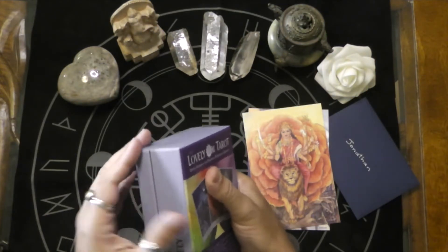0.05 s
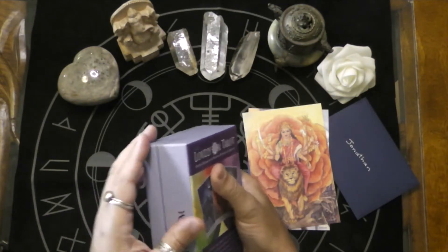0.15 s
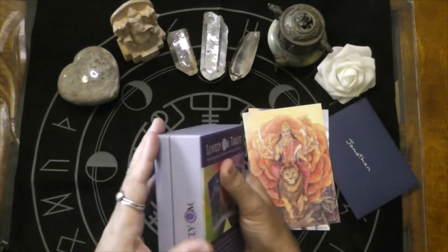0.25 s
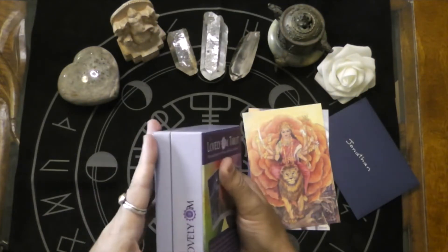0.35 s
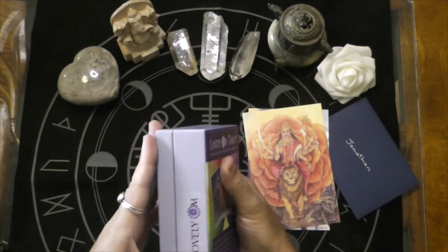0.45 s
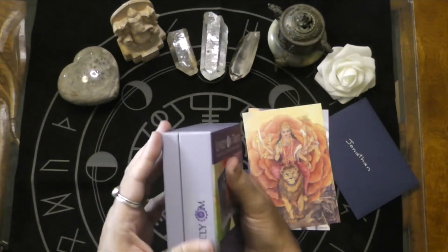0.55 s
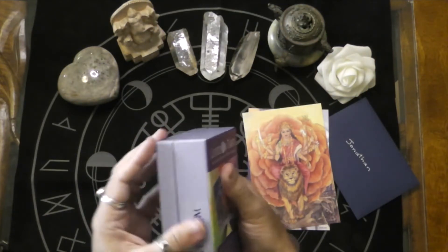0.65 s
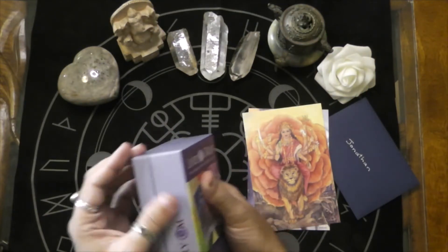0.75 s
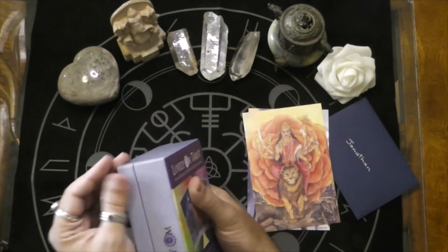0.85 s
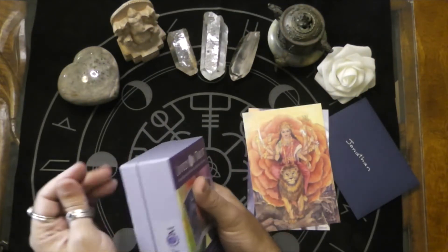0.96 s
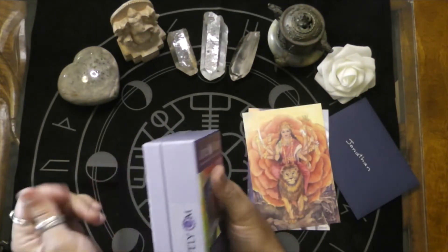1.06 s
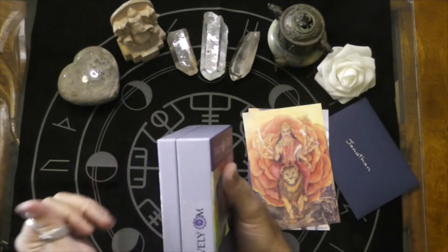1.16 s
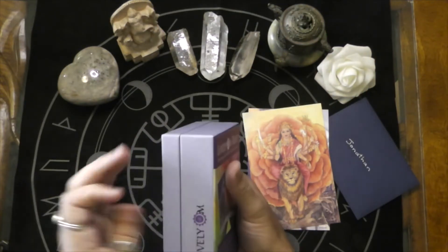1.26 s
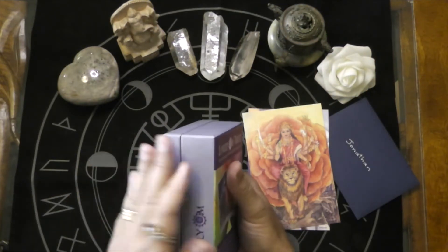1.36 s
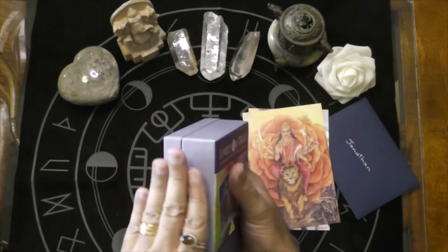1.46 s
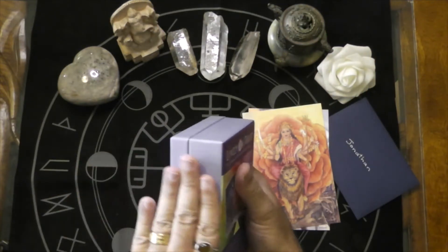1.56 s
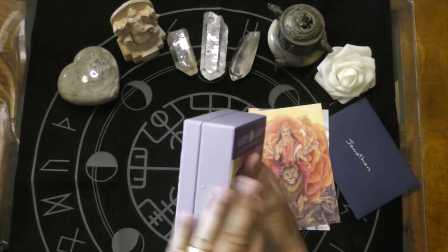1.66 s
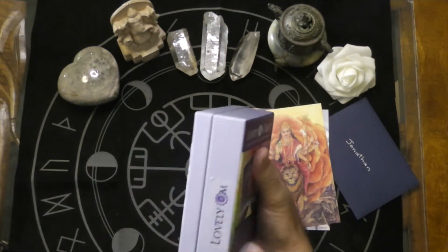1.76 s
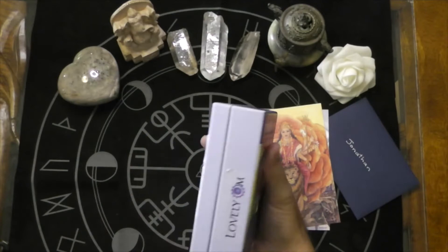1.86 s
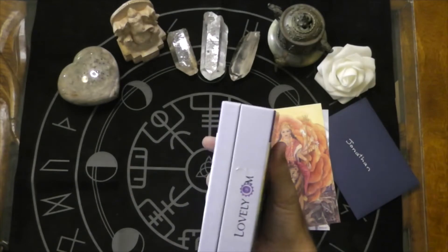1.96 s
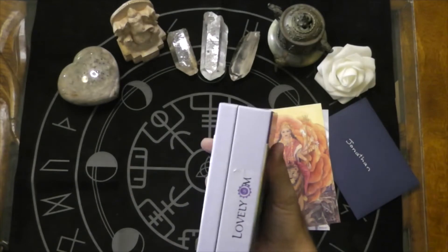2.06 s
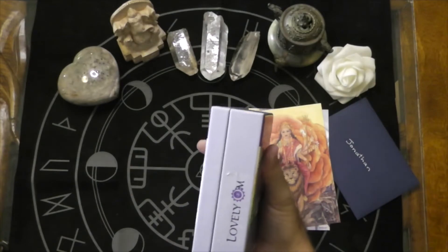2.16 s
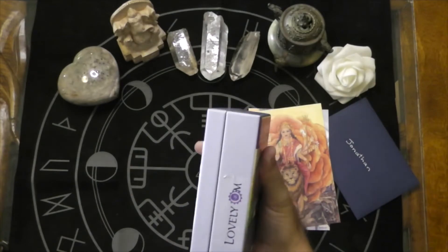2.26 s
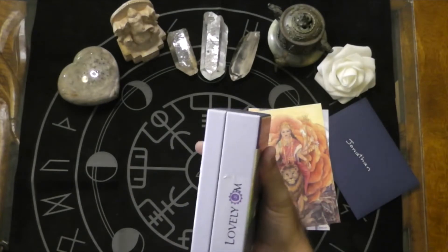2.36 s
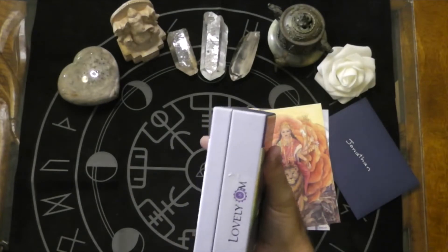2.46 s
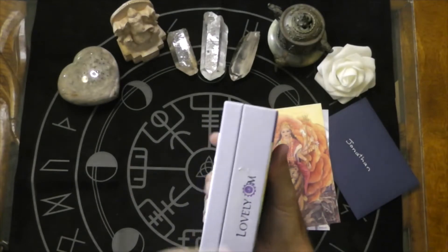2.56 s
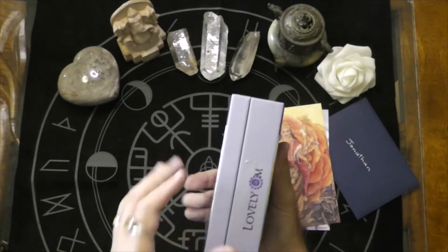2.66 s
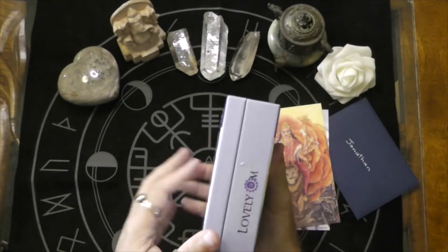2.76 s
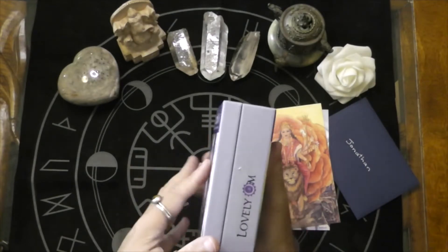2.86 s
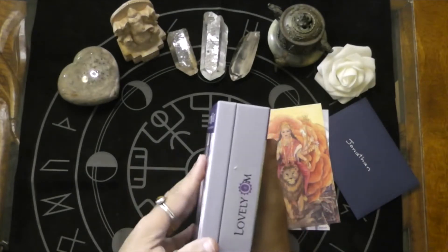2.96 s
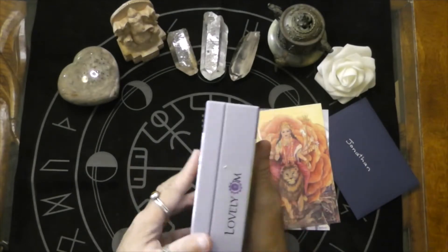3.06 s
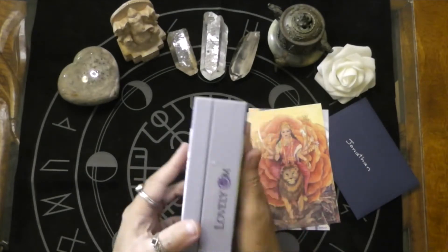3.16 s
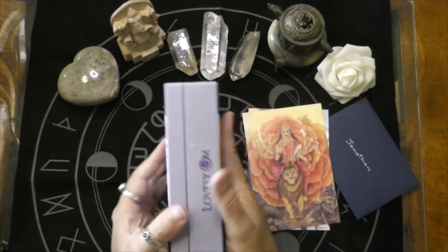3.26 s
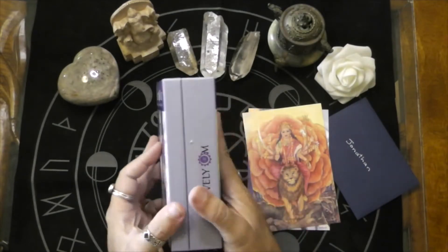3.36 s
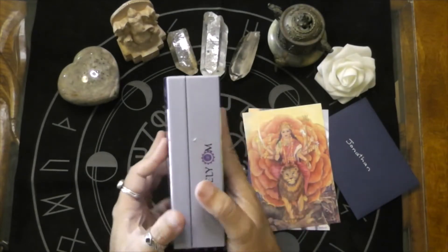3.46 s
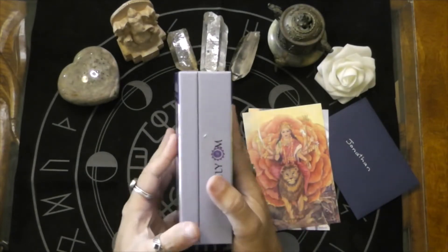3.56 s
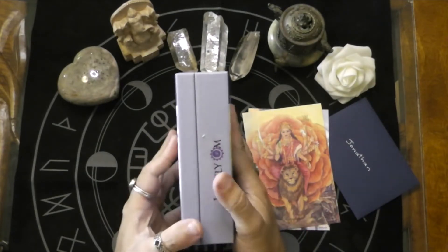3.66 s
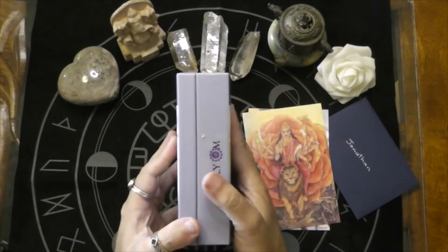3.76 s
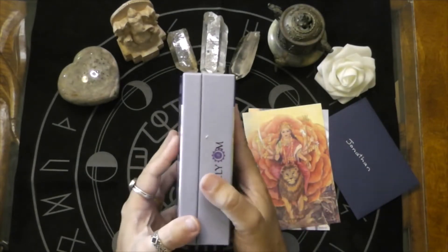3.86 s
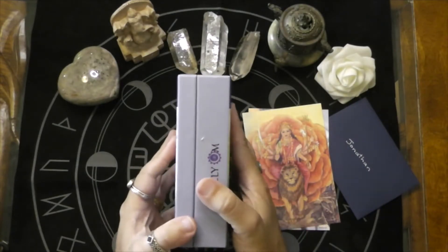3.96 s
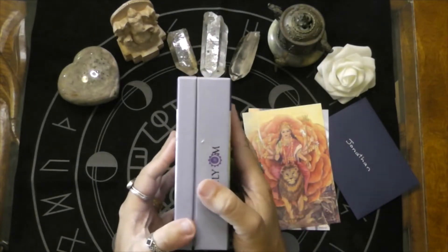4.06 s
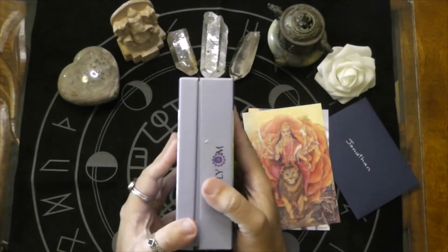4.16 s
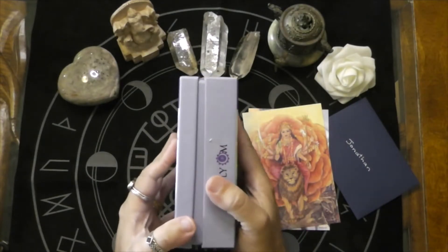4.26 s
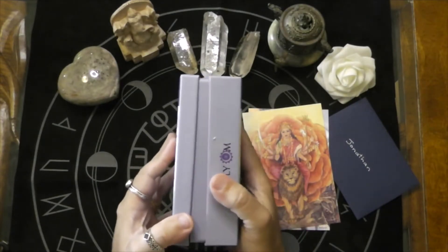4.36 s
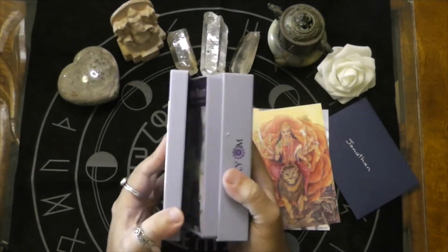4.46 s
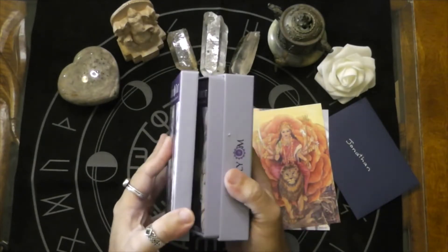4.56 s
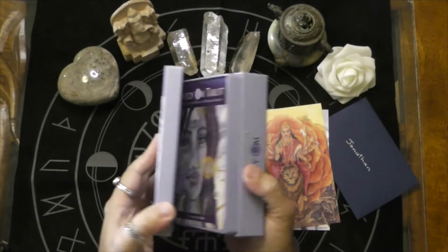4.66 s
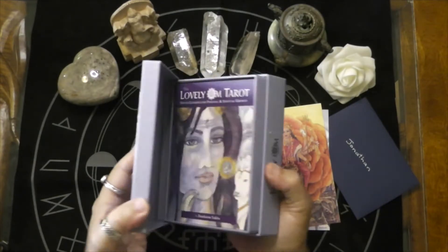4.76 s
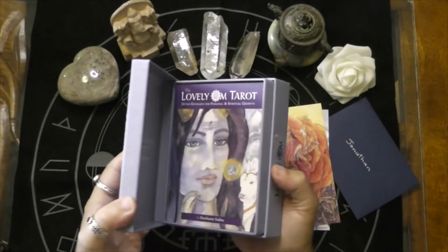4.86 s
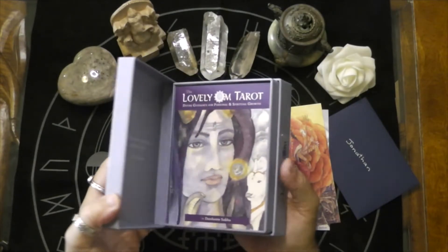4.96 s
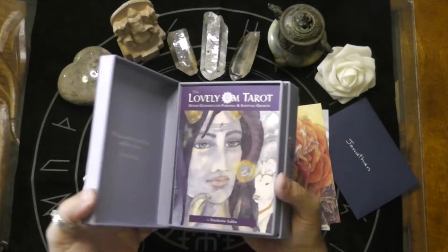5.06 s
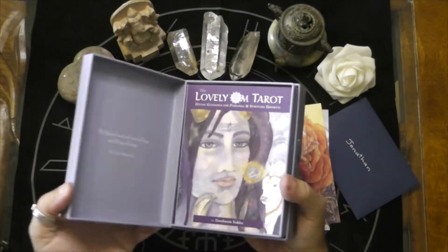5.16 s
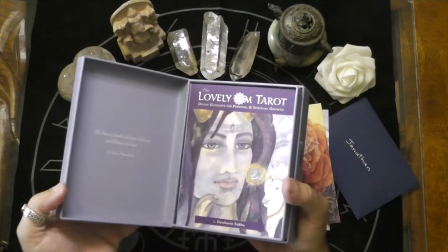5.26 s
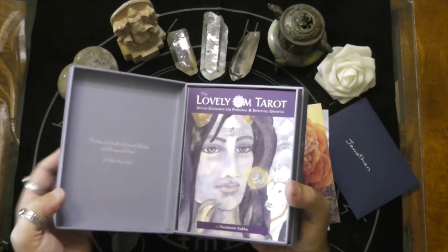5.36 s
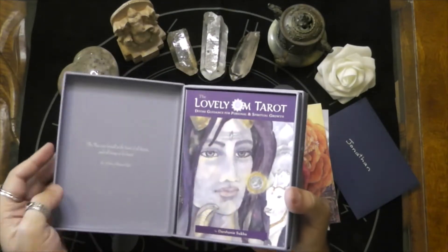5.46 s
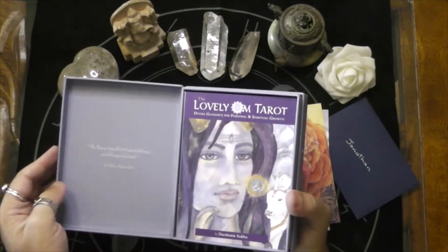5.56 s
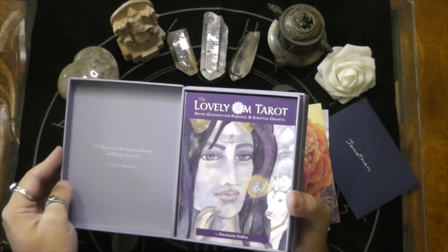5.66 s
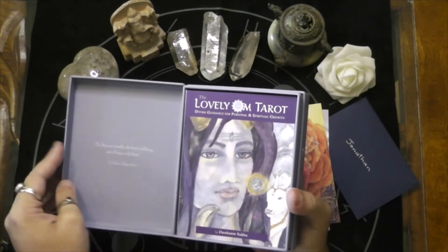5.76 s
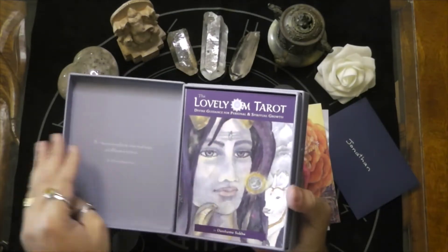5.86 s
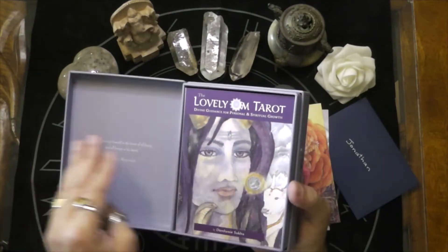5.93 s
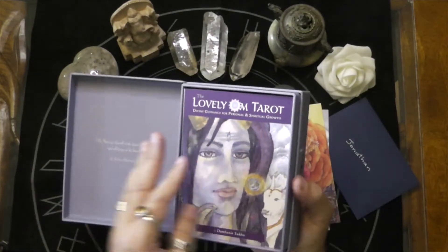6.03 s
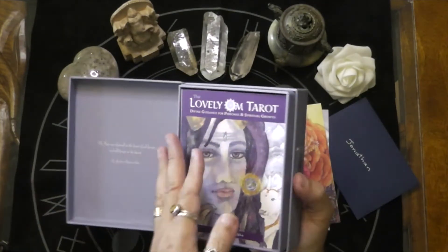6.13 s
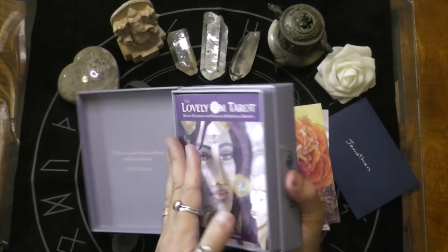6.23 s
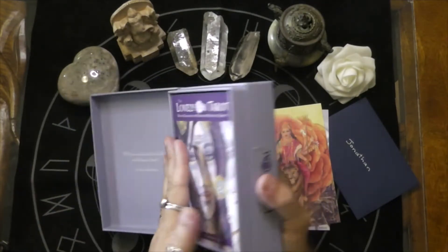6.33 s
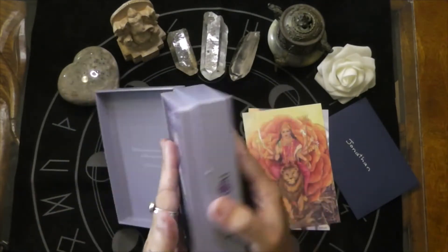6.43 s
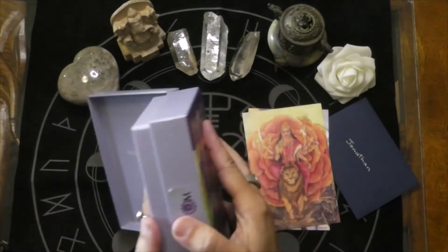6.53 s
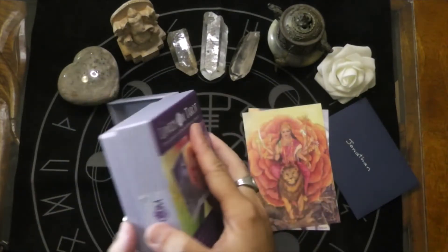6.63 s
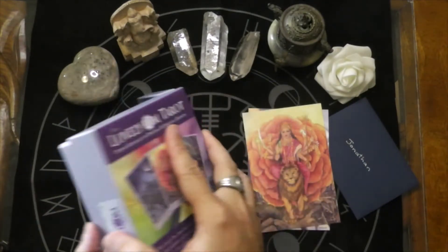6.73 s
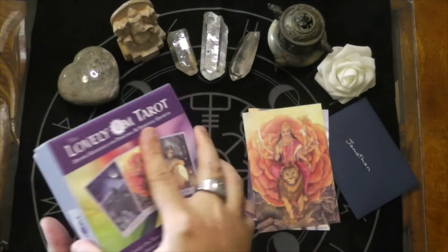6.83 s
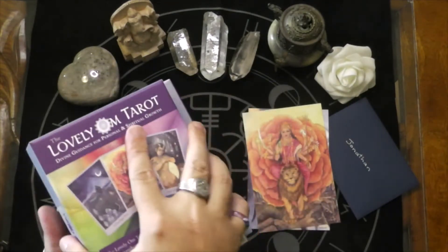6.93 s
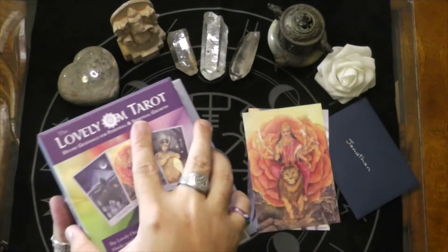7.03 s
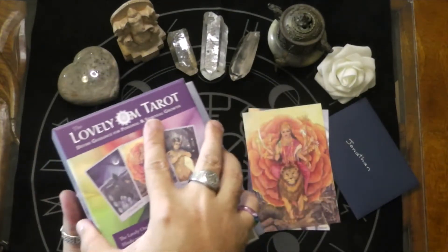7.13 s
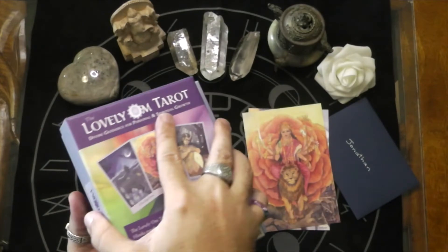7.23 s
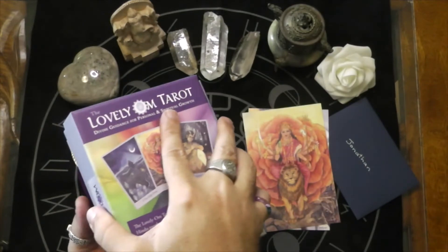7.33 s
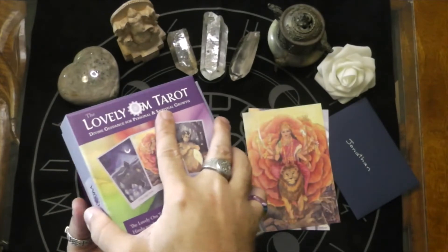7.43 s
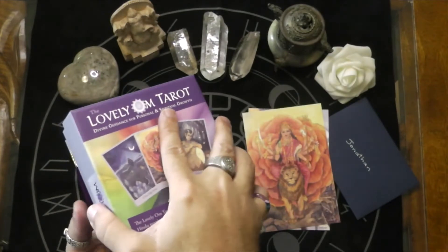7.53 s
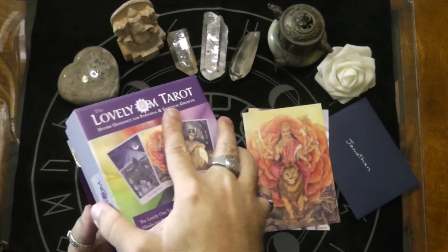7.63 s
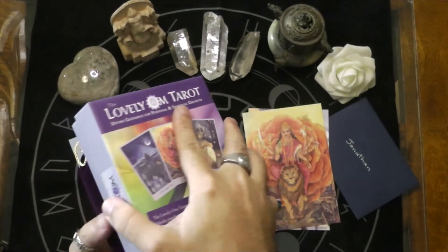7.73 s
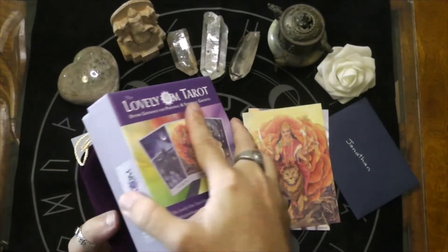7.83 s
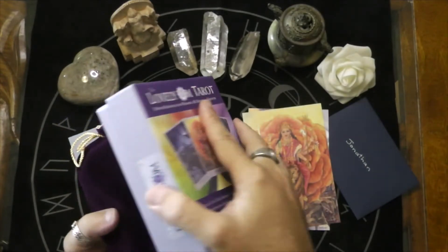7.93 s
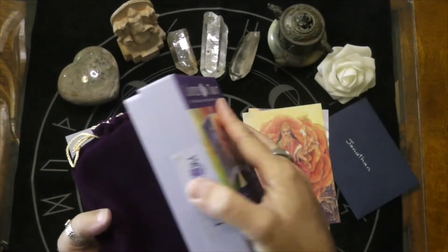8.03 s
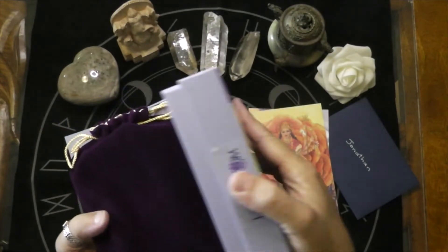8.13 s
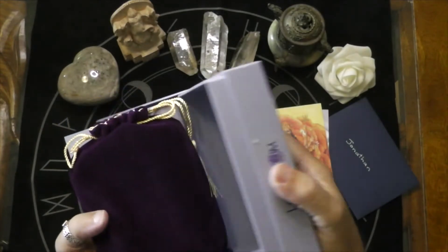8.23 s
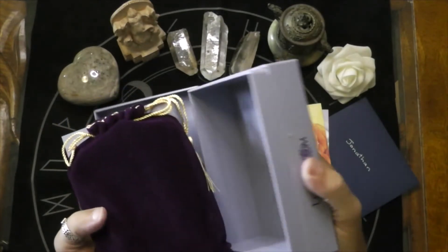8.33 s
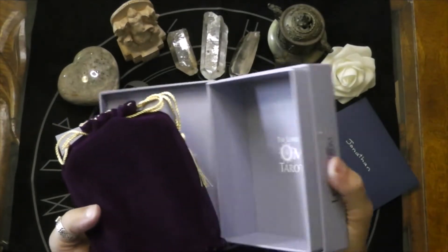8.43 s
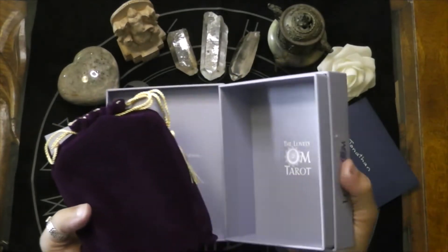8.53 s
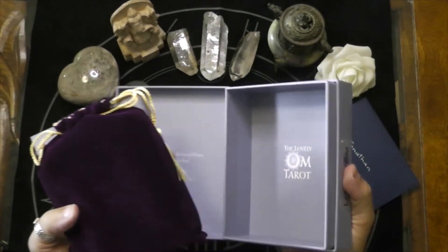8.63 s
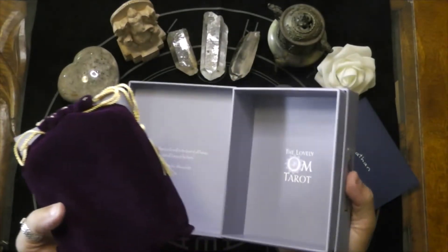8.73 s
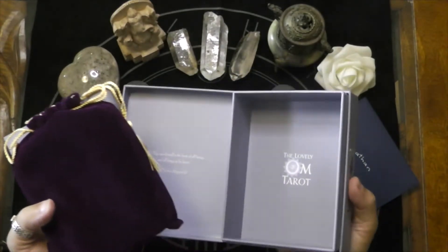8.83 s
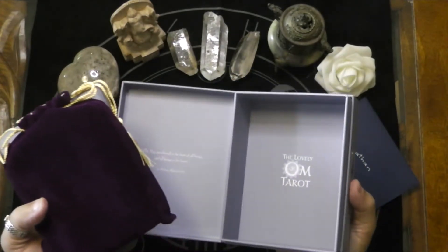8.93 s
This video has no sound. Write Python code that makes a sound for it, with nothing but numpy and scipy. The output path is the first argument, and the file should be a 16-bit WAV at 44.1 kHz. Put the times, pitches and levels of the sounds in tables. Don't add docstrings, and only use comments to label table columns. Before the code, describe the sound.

A quiet indoor room, close stereo microphone, with low room tone, soft hiss, a faint distant motor hum and slight floor shake. From 0 to 0.9 seconds fingers tick, tap and rub a stiff cardboard box in dry, hissing strokes. Lighter touches follow around 1.0 to 1.3, then a busy burst at 1.4 to 1.8: snaps, hollow taps and the brightest rubbing. It quiets until about 2.4, when crisp ticks and short drags return, with a bright swish near 3.2. Sparse rubs and a dull tap come at 3.5 to 4.4. From 4.6 to 6.2 the lid opens with small scrapes, ticks and hollow taps. At 6.3 a loud, hard clack bounces rapidly and dies, followed by rough rubbing to 6.8. Softer low sliding and a tiny squeak come around 7.1, a faint tap at 7.7, then gentle brushing and small ticks until 9.

```python
import sys
import numpy as np
from scipy import signal
from scipy.fft import rfft, irfft, next_fast_len
from scipy.io import wavfile

SR = 44100
rng = np.random.default_rng(int(sys.argv[2]) if len(sys.argv) > 2 else 0)


def put_to_file(sound):
    columns = np.atleast_2d(sound).T
    safe = np.clip(columns, -1, 1)
    whole_steps = np.round(safe * 32767)
    wavfile.write(sys.argv[1], SR, whole_steps.astype(np.int16))


def decibels_to_gain(level_db):
    exponent = np.asarray(level_db, float) / 20
    return 10 ** exponent


N = 396459
STEP_HZ = 2280

# frequency in Hz, left minus right in dB.
LEAN = [(60, -3), (380, -2.5), (2380, -0.5), (15000, 1.5)]


def rms_one(x):
    return x / np.sqrt(np.mean(x ** 2) + 1e-20)


def at_hz(points, hz):
    table_hz, values = np.array(points).T
    return np.interp(np.log(hz), np.log(table_hz), values)


def drift(rate_hz):
    r = np.exp(-80 * np.pi * rate_hz / SR)
    white = rng.standard_normal(N // 40 + 2002)
    slow = signal.lfilter([1], [1, -2 * r, r * r], white)[2000:]
    return np.interp(np.arange(N) / 40, np.arange(len(slow)), rms_one(slow))


def ring(push, hz, t60_s):
    r, w = decibels_to_gain(-60 / (t60_s * SR)), 2 * np.pi * hz / SR
    return signal.lfilter([0, np.sin(w)], [1, -2 * r * np.cos(w), r * r], push + 1e-18)


def band_pass(x, order, low_hz, high_hz):
    return signal.sosfilt(signal.butter(order, [low_hz, high_hz], "band", fs=SR, output="sos"), x)


def below(x, hz):
    return signal.sosfilt(signal.cheby2(14, 60, hz, fs=SR, output="sos"), x)


def add(out, start_s, sound):
    i = round(start_s * SR)
    out[i:i + len(sound)] += sound[:N - i]


def to_stereo(mid, side, likeness, hz):
    alike = np.clip(at_hz(likeness, hz), 0, 1)
    lean = decibels_to_gain(at_hz(LEAN, hz) / 2 * np.array([[1], [-1]]))
    return lean * (np.sqrt(1 + alike) * mid + np.sqrt(1 - alike) * side * [[1], [-1]])


def coloured(spectrum, likeness):
    size = next_fast_len(N)
    hz = np.maximum(np.arange(size // 2 + 1) * SR / size, 1)
    mid, side = rfft(rng.standard_normal((2, size)))
    both = decibels_to_gain(at_hz(spectrum, hz)) * to_stereo(mid, side, likeness, hz)
    return rms_one(irfft(both, size)[:, :N])


def banded(spectrum, likeness, white, patchy_db, patch_hz, tilt_db=0):
    low_hz, high_hz = spectrum[0][0], spectrum[-1][0]
    edges = np.geomspace(low_hz, high_hz, int(3.5 * np.log2(high_hz / low_hz)) + 2)
    out, power = 0, 0
    for k, (low, high) in enumerate(zip(edges, edges[1:])):
        mid, side = band_pass(white[k % 2], 2, low, high)
        hz = np.sqrt(low * high)
        band = decibels_to_gain(at_hz(spectrum, hz)) * to_stereo(mid, side, likeness, hz)
        power += np.mean(band[:, ::7] ** 2)
        out = out + band * decibels_to_gain(patchy_db * drift(patch_hz) + tilt_db * np.log2(hz / 6000))
    return out / np.sqrt(power)


def grains(per_s, spread_db):
    born = rng.random(N) < per_s / SR
    sizes = decibels_to_gain(spread_db * np.minimum(rng.exponential(1, N), 2.5))
    white = np.clip(rng.standard_normal((2, 2, N)), -3, 3)
    return rms_one(white * (born * sizes + .6))


def slide():
    # frequency in Hz, density in dB per Hz.
    skin = [(2300, -21), (2700, -12), (3300, -15), (3900, -7.5), (6500, -6), (9200, -1.5), (10500, -1.5),
            (13500, -7), (17000, -3.5)]
    # frequency in Hz, density in dB per Hz.
    board = [(250, 3.5), (400, -4.5), (650, 8), (900, 2), (1400, 0.5), (2000, -5.5), (2500, -2.5)]
    # frequency in Hz, left-right likeness (0 to 1).
    near_likeness = [(60, 0.7), (240, 1), (950, 0.92), (3770, 0.61), (8000, 0.92), (15000, 0.8)]
    hiss_db, bright_db, board_db = strokes()
    skin_slips = grains(per_s=7000, spread_db=1.6)
    board_slips = grains(per_s=1500, spread_db=3.5)
    tilt_db = 0.56 * (bright_db - 3.5)
    hiss = banded(skin, near_likeness, skin_slips, patchy_db=1.8, patch_hz=11, tilt_db=tilt_db)
    rumble = banded(board, near_likeness, board_slips, patchy_db=2.8, patch_hz=13.5)
    flutter_db = .9 * drift(19)
    hiss = decibels_to_gain(hiss_db + 4.5 + flutter_db) * hiss
    return hiss + decibels_to_gain(board_db - 2.0) * below(rumble, 1.102 * STEP_HZ)


def strokes():
    # start in s, hold in s, hiss in dB, brightness in dB, board rumble in dB.
    rub_rows = [(0.016, 0.0084, -67, 4, -75), (0.094, 0.005, -59, -7, -55),
                (0.168, .25, -54.5, -0.5, -57.5), (0.534, 0.2, -54, -1, -58), (0.747, 0.11, -54, 1, -55),
                (1.056, 0.064, -62, 5, -66), (1.2, .03, -67, 3, -68), (1.316, 0.011, -64, 0, -66),
                (1.409, 0.027, -54, -8, -52), (1.429, 0.07, -51, 0, -53.5), (1.565, .02, -52.5, 1, -57),
                (1.582, 0.12, -46, 6.5, -55.5), (1.72, 0.037, -49.5, 1, -52), (3.122, 0.12, -55.5, 5, -60),
                (2.468, 0.052, -62.5, -2, -66), (2.568, 0.11, -57.5, -2.5, -53.5),
                (2.745, 0.12, -62.5, 1, -56.5), (3.764, 0.033, -59.5, 2, -57), (4.158, 0.0047, -59, 1, -52),
                (4.336, 0.13, -63.5, -4, -61), (4.654, 0.076, -60.5, -6, -57.5),
                (4.756, 0.036, -57, -1, -52.5), (4.902, 0.028, -61, 10, -69), (4.842, 0.12, -62.5, -2, -57),
                (4.992, 0.09, -61.5, -5, -51.5), (5.108, .04, -61, -6, -56), (5.18, 0.046, -60, -3, -55),
                (5.373, 0.11, -60.5, 2, -58.5), (5.744, .005, -61.5, -4, -67),
                (5.83, 0.017, -61.5, -5, -52.5), (6.01, 0.058, -58.5, 1, -57.5),
                (6.35, 0.12, -52, -5.5, -46), (6.743, 0.12, -59, -3, -64), (7.672, .05, -76, 0, -57),
                (7.98, 0.11, -63.5, -3, -62), (8.797, 0.11, -65.5, -3, -56.5)]
    # peak in s, time to fade 20 dB in s, hiss in dB, brightness in dB, board rumble in dB.
    sweep_rows = [(.9, 0.1, -62, 1, -47), (.55, 0.08, -53.5, -4, -48), (1.0, 0.3, -72, -13, -55.5),
                  (1.1, 0.1, -62, 0, -64), (1.237, 0.13, -58, -1, -67), (1.83, -0.2, -67, -6, -63),
                  (2.36, 0, -65, 2, -60), (2.95, 0.27, -56, -1, -63), (3.04, 0.5, -64, -20, -58),
                  (3.18, 0.1342, -49, 8, -51.5), (3.3, 0.09, -54.5, 4, -65), (3.472, 0.05, -58.5, -1, -70),
                  (3.545, -0.1, -60.5, 2, -68), (3.59, 0, -65, -6, -56), (3.68, -0.26, -64, 0, -54),
                  (4.22, 0.03, -63.5, -3, -50.5), (4.55, 0.1, -73, -1, -69), (5.47, 0.17, -60, -1.5, -70),
                  (5.9, 0.13, -63.5, -2, -73), (6.12, -0.04, -58, 2, -53), (6.2, 0.1, -53.5, 1, -52),
                  (6.6, 0.15, -56.5, -7, -51), (6.68, 0.36, -59, -5, -51.5), (6.84, -0.18, -57, -10, -63),
                  (7.1, 0.47, -60, -5, -51.5), (7.18, 0.03, -59, 0, -53), (7.25, -0.08, -59, 4, -71),
                  (7.75, .25, -66, -2, -56), (7.84, 0.1, -65.5, -2, -56), (7.917, 0.13, -60.5, -6, -55.5),
                  (8.19, 0.06, -63, -4, -59), (8.44, 0.08, -60, -10, -68), (8.572, 0.5, -68, -14, -61),
                  (8.68, 0.5, -66, -1, -65)]
    # hiss in dB, brightness in dB, board rumble in dB.
    hold_db = (-95, 0, -61)
    grip_db_per_s, stop_db_per_s = 900, 300
    round_top = 0.026

    t = np.arange(0, N + 40, 40) / SR
    rubs, sweeps = np.array(rub_rows), np.array(sweep_rows)
    start_s, hold_s = rubs[:, :1], rubs[:, 1:2]
    grip_db = grip_db_per_s * (t - start_s)
    stop_db = stop_db_per_s * (start_s + hold_s - t)
    rub_db = np.minimum(0, np.minimum(grip_db, stop_db))
    peak_s, fade_s = sweeps[:, :1], np.maximum(sweeps[:, 1:2], .03)
    sweep_db = -20 * (np.hypot((t - peak_s) / fade_s, round_top) - round_top)
    power = decibels_to_gain(2 * np.maximum(np.vstack([rub_db, sweep_db, 0 * t]), -150))

    hiss_db, bright_db, board_db = np.vstack([rubs[:, 2:], sweeps[:, 2:], hold_db]).T
    hiss = decibels_to_gain(2 * hiss_db) @ power
    board = decibels_to_gain(2 * board_db) @ power
    bright = (decibels_to_gain(2 * hiss_db) * bright_db) @ power / hiss
    curves = 10 * np.log10(hiss), bright, 10 * np.log10(board)
    return [np.interp(np.arange(N) / SR, t, curve) for curve in curves]


def ticks():
    # time in s, peak in dB, centre in Hz, decay in s.
    hard = [(0.0919, -20.5, 10200, 0.027), (.1797, -41, 3600, .012), (0.092, -32.5, 3900, 0.022),
            (0.1406, -26, 10000, 0.015), (1.2296, -30, 10000, 0.013), (1.292, -28.5, 8100, 0.023),
            (1.3982, -25, 9250, 0.036), (1.4285, -24, 3800, 0.035), (1.4286, -39, 6000, .012),
            (1.4285, -28.5, 2800, 0.017), (1.7432, -38, 2900, .02), (1.4288, -22, 10000, .012),
            (2.4633, -26.5, 10500, 0.032), (2.5812, -31, 9300, 0.015), (2.5962, -40, 3200, .01),
            (2.626, -28, 8550, 0.01), (2.666, -31, 9900, .008), (2.741, -21.5, 8800, 0.014),
            (2.7412, -31.5, 14500, .01), (2.7448, -24, 13000, .01), (4.1617, -27, 9300, 0.03),
            (4.687, -22, 11700, 0.0076), (4.9375, -35, 5500, 0.046), (5.808, -26.5, 8700, .006),
            (5.813, -38, 8800, 0.0051), (6.02, -34, 6000, 0.012), (6.0517, -23, 13000, 0.008),
            (6.0517, -29, 7600, 0.009), (6.056, -24.5, 8500, 0.012), (6.0563, -29, 13000, .008),
            (6.4275, -34, 2600, 0.043), (6.428, -30, 3470, 0.041), (6.6687, -31, 5400, 0.013),
            (8.5757, -30.5, 9450, 0.03), (8.5678, -41, 4200, .03), (8.5768, -43, 3600, .015),
            (4.944, -35, 5500, .03)]
    # time in s, peak in dB, centre in Hz.
    patter = [(0.0227, -36, 7400), (0.1695, -42, 5380), (0.2265, -33, 10200), (0.227, -31.5, 5200),
              (0.369, -36, 9640), (0.538, -39, 9050), (0.94, -43, 7000), (1.193, -41, 8940),
              (0.4815, -36, 9980), (1.5633, -38, 9780), (1.5708, -41, 8940), (1.5285, -38, 12000),
              (2.807, -37.5, 10400), (2.82, -32, 10300), (4.333, -39, 9480), (4.6422, -34, 9800),
              (4.7466, -39, 9170), (5.0315, -36, 4280), (5.109, -40, 8190), (5.1881, -40.5, 8580),
              (6.136, -44, 9390), (6.436, -29, 4500), (6.546, -49, 2400), (4.845, -57, 2200),
              (5.191, -42, 2670), (1.3155, -41, 8840), (3.4655, -45, 8190), (3.755, -39, 10400),
              (3.364, -48, 9300), (3.383, -55, 10000), (3.583, -49, 9000), (3.595, -43, 11000),
              (6.351, -44, 6160), (.91, -42, 9000), (7.058, -45, 10000), (8.5612, -41, 6380),
              (2.568, -41, 9000), (2.6195, -47, 7500), (2.636, -45, 9500), (2.6515, -33, 7500)]
    patter_decay_s = .011
    out, t = np.zeros(N), np.arange(1300) / SR
    for s, db, hz, decay_s in hard + [row + (patter_decay_s,) for row in patter]:
        fade = .55 * decibels_to_gain(-60 * t / max(decay_s, .002)) + .1 * decibels_to_gain(-60 * t / .05)
        wisp = rng.standard_normal(len(t)) * fade
        wisp[[2, 32]] += 5.5, -3.2
        snap = band_pass(wisp, 2, hz * 0.68, min(hz * 1.52, 18500))
        add(out, s, decibels_to_gain(db - 3.0) * snap / np.abs(snap).max())
    return out


def taps():
    # time in s, peak in dB, panel mode in Hz, upper modes in dB,
    # t60 in s.
    board_taps = [(0.0925, -31.5, 650, -5.5, 0.022), (0.0973, -29.5, 269, -24, 0.11),
                  (.18, -26, 545, -15, 0.017), (.189, -32, 425, -19, .06), (0.371, -44, 340, 4, .06),
                  (0.521, -34.5, 374, -26, 0.084), (0.536, -33, 316, -24, 0.14), (.77, -55, 620, 0, 0.032),
                  (.785, -36.5, 820, -7, 0.046), (0.908, -31, 900, -0.5, 0.025), (.909, -39, 447, -20, .04),
                  (1.3997, -37, 750, 0, 0.044), (1.4293, -21.5, 397, -9, 0.063),
                  (1.453, -25, 463, -29, 0.032), (1.464, -33.5, 359, -26, 0.21),
                  (1.629, -37, 384, -3, 0.048), (1.723, -32, 420, -20, 0.044),
                  (1.7428, -26, 745, -18, 0.033), (1.7505, -29.5, 625, -25, 0.04),
                  (1.756, -30, 400, -22, 0.042), (1.734, -33, 400, -16, .03), (1.77, -33, 420, -16, 0.029),
                  (2.598, -35, 224, -6, 0.039), (2.845, -30, 245, -25, 0.043), (3.027, -34, 280, -14, 0.038),
                (3.756, -28, 268, -15, 0.031), (4.763, -37, 447, -7, 0.04), (4.751, -40, 700, -5, .03),
                (4.777, -34, 720, -13, 0.035), (4.81, -39, 820, -8, .03), (4.845, -40, 640, -3, 0.028),
                (5.014, -39, 670, -11, 0.033), (4.937, -38, 640, -3, 0.065), (5.0314, -32, 800, -3, 0.016),
                (5.191, -45, 484, 8.5, .03), (5.342, -36.5, 550, -4, 0.035), (5.8415, -33, 660, -13, 0.02),
                (6.1959, -35, 880, 1.5, 0.024), (6.432, -32, 280, -2, 0.14),
                (6.569, -32.5, 613, -1.5, 0.036), (6.496, -34, 700, -5, 0.036), (6.546, -46, 720, 1, .025),
                (6.621, -39.5, 600, 3, .04), (6.701, -40, 470, -3, .03), (7.008, -46, 900, 0, .03),
                (6.67, -42.5, 221, 2, 0.13), (7.295, -35, 746, -5, 0.088), (7.697, -39, 762, -10, 0.1),
                (8.5683, -41, 342, 5, .04), (8.576, -47.5, 400, 8.5, .03)]
    out = np.zeros(N)
    for s, db, hz, upper_db, t60_s in board_taps:
        chance = rng.normal(0, 1, 4)
        t60_s = max(t60_s, .008)
        push = np.zeros(6000)
        push[:9] = np.hanning(9) / 4
        pad = np.hanning(int(SR / hz / 3))
        soft = np.pad(pad / pad.sum(), (0, len(push) - len(pad)))
        body = ring(soft, hz, t60_s)
        body += .5 * ring(soft, hz * (1.46 + 0.045 * chance[0]), 0.85 * t60_s)
        body -= 0.23 * ring(soft, hz * (0.68 + 0.092 * chance[1]), t60_s)
        upper = ring(push, 1350 + 150 * chance[2], 0.019)
        upper += 0.5 * ring(push, 2050 + 150 * chance[3], 0.013)
        add(out, s, -decibels_to_gain(db - 4.5) * (body + decibels_to_gain(upper_db + 1.5) * upper))
    return out


def drop():
    # time in s, peak in dB, contact in ms.
    bounces = [(6.2964, -19, 0.77), (6.2976, -4.5, 0.82), (6.306, -13.5, 0.32), (6.309, -28, 0.69),
               (6.303, -23, 0.46), (6.317, -9.5, 2.1), (6.328, -22, 2.3), (6.336, -23, 0.8),
               (6.342, -28.5, 0.35), (6.349, -22, 3.1), (6.366, -20, 1.7), (6.375, -28, 0.76)]
    # frequency in Hz, level in dB, t60 in s.
    box = [(280, -15, 0.12), (400, -8.5, 0.029), (550, -2.5, 0.01), (900, -0.5, 0.0067),
           (1130, -9.5, 0.016), (1560, -26, 0.016), (157.5, -37, 0.29), (104, -44, .4), (192, -31, 0.075),
           (724, -25, 0.072)]
    settle_db, settle_t60_s = -43.5, 0.5
    push, t = np.zeros(SR // 2), np.arange(SR // 2) / SR
    first_s = bounces[0][0]
    for s, db, contact_ms in bounces:
        contact = np.hanning(round(contact_ms * SR / 1000))
        add(push, s - first_s, decibels_to_gain(db) * contact / contact.sum())
    blow = sum((-1) ** k * decibels_to_gain(db) * ring(push, hz, t60_s) for k, (hz, db, t60_s) in enumerate(box))
    dull = band_pass(rng.standard_normal(len(t)), 2, 95, 1200)
    shudder = decibels_to_gain(settle_db - 60 * t / settle_t60_s) * rms_one(dull) * np.minimum(t / 0.012, 1)
    edge = band_pass(rng.standard_normal(len(t)), 2, 1700, 3600)
    crack = decibels_to_gain(-62 - 60 * t / 0.15) * rms_one(edge)
    out = np.zeros(N)
    add(out, first_s, below(shudder - blow, 0.91 * STEP_HZ) + crack)
    return out


def squeaks():
    # start in s, length in s, resonance in
    # Hz, level in dB, ring t60 in s.
    short_rubs = [(7.05, 0.087, 1740, -62, 0.016), (7.107, 0.031, 1790, -53.5, 0.043),
                  (8.425, 0.034, 1640, -59.5, .015), (.755, 0.071, 1220, -50, 0.0034),
                  (4.945, 0.045, 790, -46.5, 0.0059), (6.622, .03, 1500, -53, 0.0048),
                  (1.7, .04, 7200, -53, .002), (1.615, 0.081, 4200, -53, .002),
                  (1.712, .03, 6000, -50.5, 0.0023), (1.63, .09, 13500, -51, .001),
                  (7.08, 0.055, 5100, -62, .003), (7.9, 0.084, 9200, -62, .002),
                  (0.69, .06, 9200, -62, .002), (3.15, 0.09, 10300, -51, 0.0013),
                  (3.28, .05, 9700, -61, .002), (1.46, .04, 9500, -53, .0015)]
    out = np.zeros(N)
    for s, length_s, hz, db, t60_s in short_rubs:
        rub = rng.standard_normal(4000)[:round(length_s * SR)]
        squeak = rms_one(ring(rub, hz, t60_s))
        add(out, s, decibels_to_gain(db) * squeak * signal.windows.tukey(len(rub), .4))
    return out


def room(x):
    t60_s, wall_cut_hz = 0.64, 1070
    size = next_fast_len(N + SR)
    w = 2 * np.pi * np.arange(size // 2 + 1) / size
    dull = 1 / (1 + 1j * w * SR / (2 * np.pi * wall_cut_hz))
    tails = np.zeros((2, len(w)), complex)
    for k, lag_s in enumerate(rng.uniform(.011, 0.066, 16)):
        loop = decibels_to_gain(-60 * lag_s / t60_s) * dull * np.exp(-1j * w * round(lag_s * SR))
        tails[k % 2] += (-1) ** (k // 2) * loop / (1 - loop)
    return irfft(tails * rfft(x, size), size)[:, :N]


def air():
    # frequency in Hz, density in dB per Hz.
    tone_spectrum = [(36, -38), (52, 12), (100, 0), (150, 5), (250, 5.5), (350, 4.5), (450, 5), (540, 0.5),
                     (800, 0), (1230, -2.5), (1580, -9), (2100, -13.5), (2400, -21)]
    # frequency in Hz, density in dB per Hz.
    hiss_spectrum = [(1380, -30), (2350, -10), (3490, -11), (5130, -4), (5820, -6.5), (6820, -6),
                     (7500, -11), (9060, -6.5), (10000, -10.5), (15500, -19.5)]
    # frequency in Hz, left-right likeness (0 to 1).
    far_likeness = [(60, 0.5), (240, 0.86), (950, 0.45), (3770, 0.017), (15000, 0.032)]
    # time in s, level in dB.
    shake_levels = [(0, -51.5), (.3, -56), (1.3, -54), (2.3, -56.5), (4.7, -55.5), (5.9, -56),
                    (6.62, -56.5), (6.9, -49.5), (7.8, -52), (8.3, -55.5), (8.99, -58)]
    # multiple of the motor pitch, level in dB.
    motor = [(1, -70), (2, -66), (3, -72), (5, -62.5), (7, -60.5), (8, -67), (10, -71)]
    # frequency in Hz, width in Hz, level in dB.
    whines = [(7040, 40, -82), (9050, 140, -89), (9300, 240, -90)]
    tone_db, hiss_db, motor_hz = -51, -64.5, 58.83

    tone = below(coloured(tone_spectrum, far_likeness), 1.177 * STEP_HZ)
    tone = decibels_to_gain(tone_db + 1.0 * drift(1.7)) * tone
    hiss = decibels_to_gain(hiss_db + 0.55 * drift(6.6)) * coloured(hiss_spectrum, far_likeness)
    shake_db = np.interp(np.arange(N) / SR, *np.transpose(shake_levels))
    shake = decibels_to_gain(shake_db) * coloured([(10, -21), (24, 6.0), (32, 0.5), (42, -3.0), (70, -89.0)],
                                     [(20, 0.85), (45, 0.87), (70, 0.7)])
    turn = 2 * np.pi * np.cumsum(motor_hz * (1 + 0.002973 * drift(0.514))) / SR
    hum = np.zeros(N)
    for k, db in motor:
        phase = k * turn + rng.uniform(0, 6) + .8 * drift(1)
        hum += decibels_to_gain(db + 3 + 1.5 * drift(2.5)) * np.sin(phase)
    whine = sum(decibels_to_gain(db) * rms_one(ring(rng.standard_normal(N), hz, 5.9 / width_hz))
                for hz, width_hz, db in whines)
    return tone + hiss + shake + hum * decibels_to_gain([[-1.0], [1.0]]) + whine


def scene():
    cutoff_hz = 16170
    knocks = taps() + drop() + squeaks()
    snaps = ticks()
    near = knocks * decibels_to_gain([[-1.2], [1.2]])
    tail = decibels_to_gain(-22.5) * room(knocks + .5 * snaps)
    rest = below(near + tail + slide() + air(), cutoff_hz)
    return below(snaps, 0.99 * cutoff_hz) * decibels_to_gain([[.2], [-.2]]) + rest


def top_cut(x):
    return signal.sosfilt(signal.butter(12, 16980, fs=SR, output="sos"), x)


def record(dry):
    mic_dip = (3020, 3600, 0.26)
    low_hz, high_hz, share = mic_dip
    mix = dry - share * band_pass(dry, 1, low_hz, high_hz)
    return top_cut(mix)


dry = scene()
out = record(dry)
put_to_file(out)
```